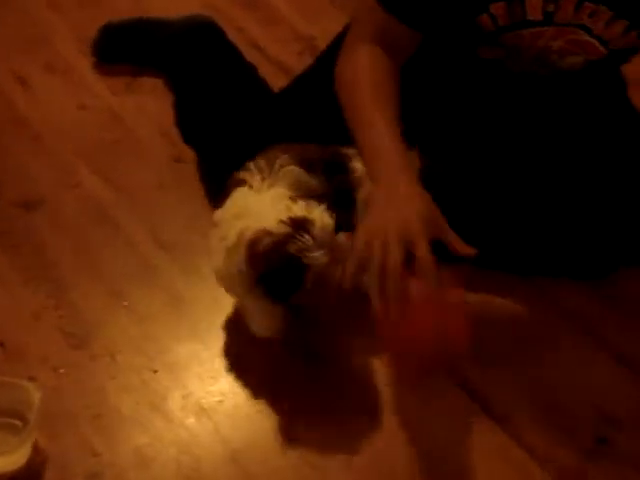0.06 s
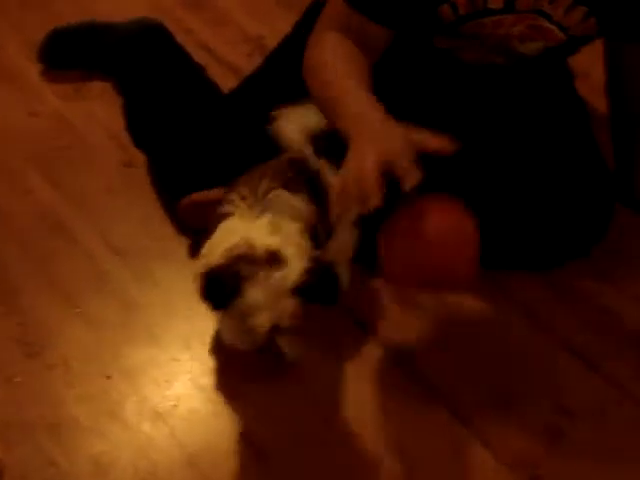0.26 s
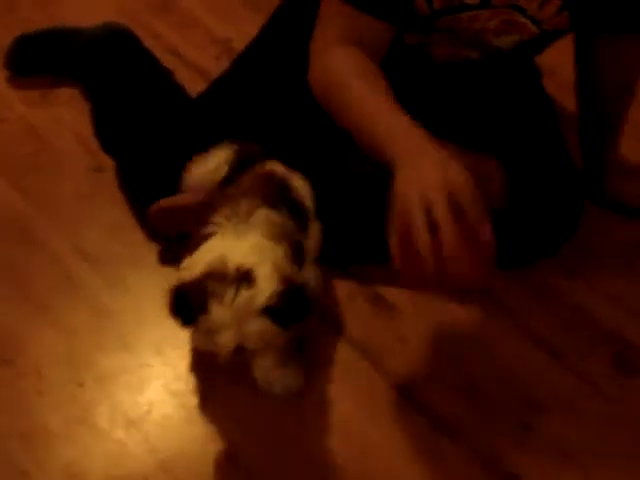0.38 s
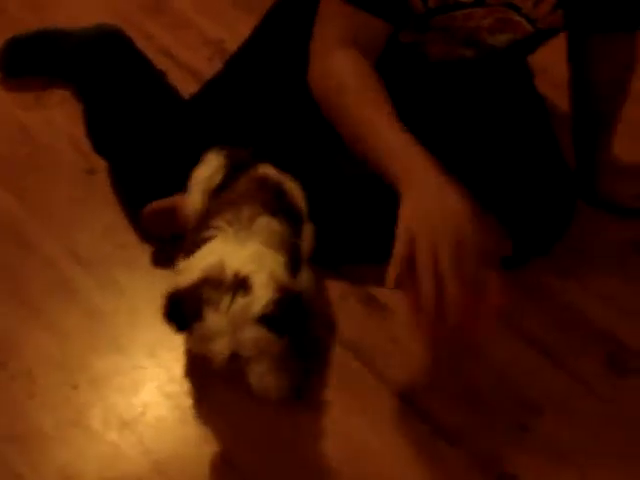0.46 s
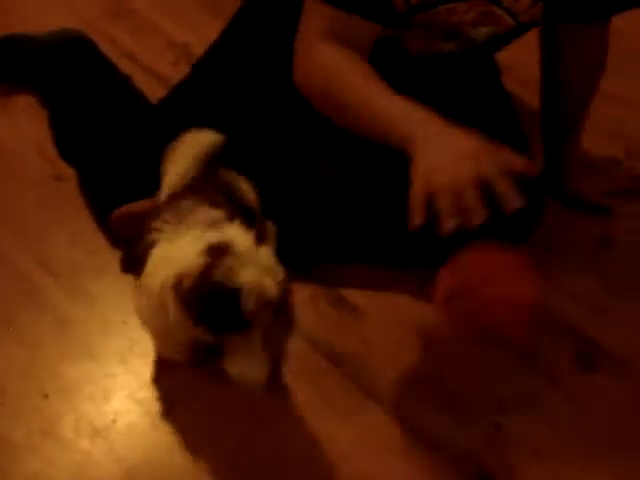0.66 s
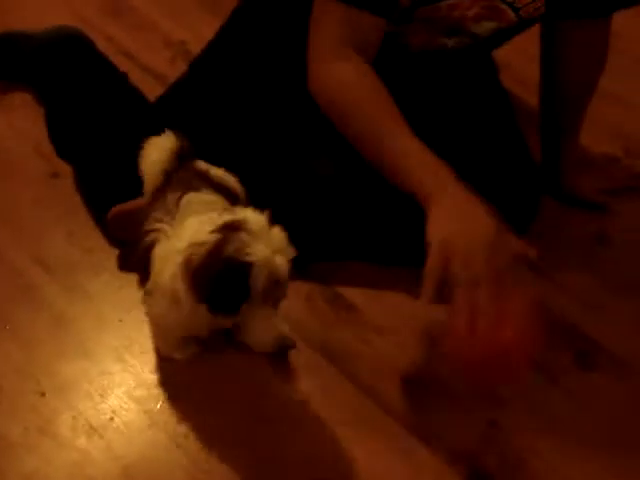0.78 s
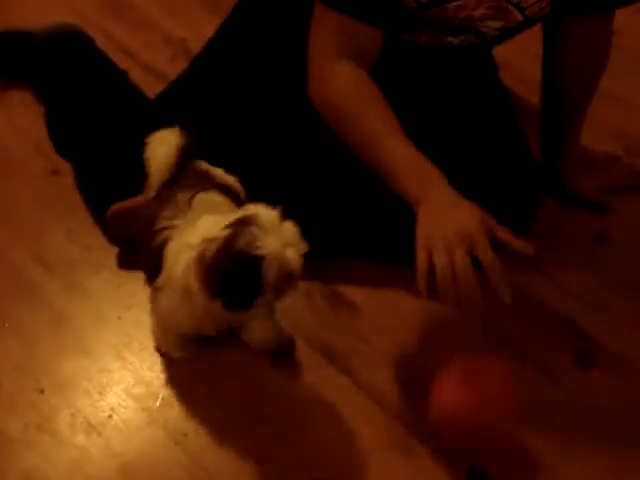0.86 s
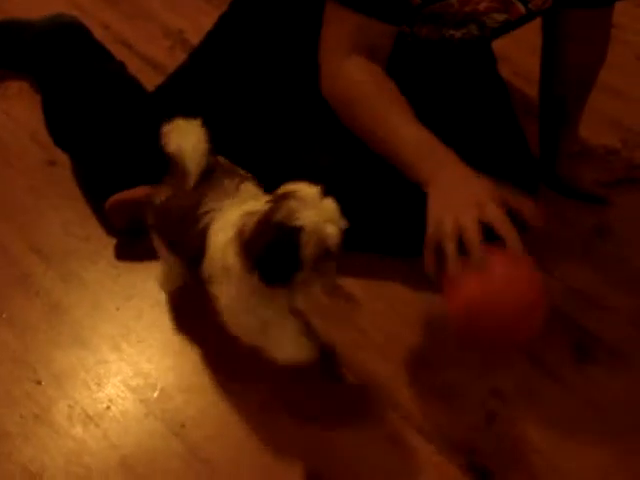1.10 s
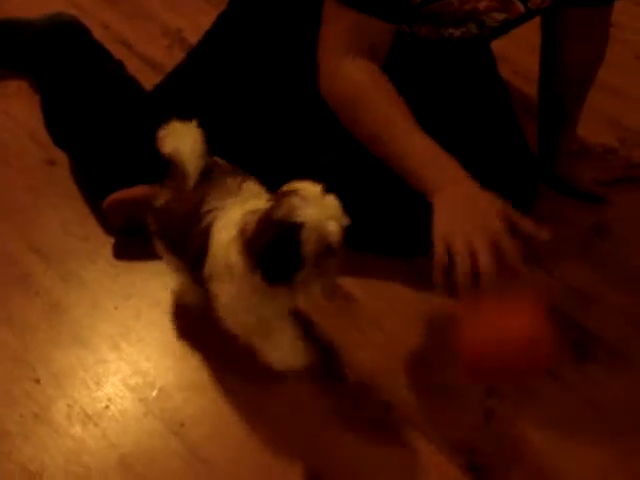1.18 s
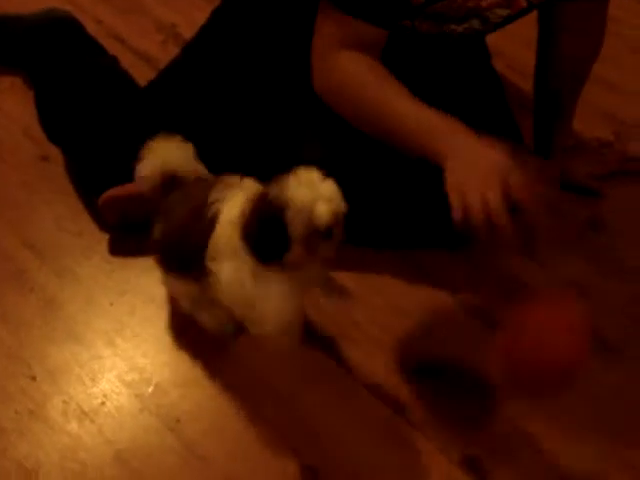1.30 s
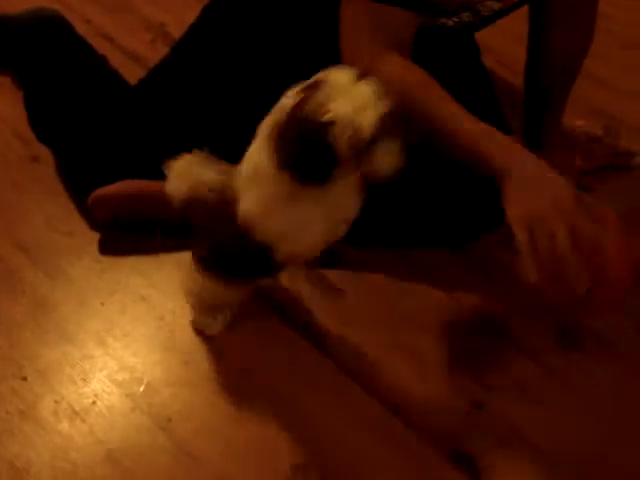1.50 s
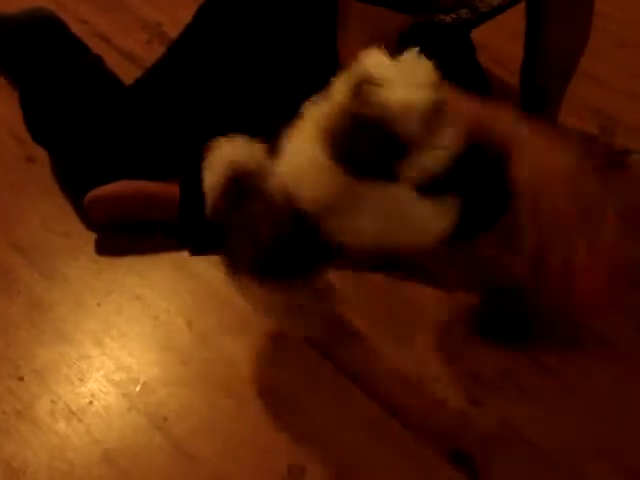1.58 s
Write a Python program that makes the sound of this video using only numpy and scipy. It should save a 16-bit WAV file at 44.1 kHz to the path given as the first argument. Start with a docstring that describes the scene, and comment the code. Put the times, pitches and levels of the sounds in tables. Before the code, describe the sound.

A small air-filled ball thuds on floorboards four times in quick succession, with a hand slap at the first bounce. The room echoes around the close microphone, and faint ticks and paw scuffs come from a dog.

```python
"""A ball bounced in a bare room

A small air-filled ball is bounced four times by hand on a wooden floor, and the bare room echoes.
Each bounce cracks, makes the boards and the ball ring, and puffs air at the close microphone.
A hand slaps the ball once. Hands and a dog's paws tap, rub and scuff over faint room noise."""
import sys
import numpy as np
from scipy import signal
from scipy.fft import rfft, irfft, next_fast_len
from scipy.io import wavfile

SR = 44100
rng = np.random.default_rng(int(sys.argv[2]) if len(sys.argv) > 2 else 0)


def dump(signal):
    """Clip the signal to [-1, 1] and save it as 16-bit WAV at the path in sys.argv[1]."""
    limited = np.clip(np.atleast_2d(signal).T, -1, 1)
    pcm = np.round(limited * 32767).astype(np.int16)
    wavfile.write(sys.argv[1], SR, pcm)


N = 72765
TOP_HZ = 10200  # the highest pitch the microphone picks up


def bounces():
    """The ball hits the floor: it cracks, boards and ball ring, air puffs out and the floor shudders."""
    # One row a bounce: start_s, crack_db, boards_db, ball_db, puff_db, echo_hold_s, echo_fade_s
    hits = [(0.2088, -20.5, -43, -29, -14.5, 0.051, 0.41), (0.6007, -21.5, -21.5, -36.5, -15, 0.018, 0.43),
            (0.9459, -21.5, -40, -35, -17, 0.024, 0.45), (1.2874, -21, -25, -37.5, -24.5, 0.011, 0.39)]
    # The tones that the floorboards and the ball ring with: pitch_hz, level_db, fade_s
    board_tones = [(206, -34, 0.22), (418.7, -1.5, 0.35), (480, -19, 0.26), (523.6, -0.5, 0.16),
                   (558, 9, 0.077), (576, 0.5, 0.21), (833, -20.5, 0.31), (868, -11, 0.36),
                   (932, -17, 0.11)]
    ball_tones = [(639, -6, 0.64), (694, -3, .5), (1045, -11.5, 0.79), (1375, -2, 0.19), (1432, -1, 0.17),
                  (1585, -19, 0.9), (1950, -4.5, 0.55), (2410, -5.5, 0.51), (2860, -3.5, .45),
                  (3188, 6.5, 0.15), (3890, -11, 0.26), (4184, 1.5, 0.3)]
    # The tone colour of the floor at each of the four landing spots: pitch_hz, level_db
    spot_1 = [(59, -61), (100, -23), (124, -17.5), (200, -5), (371, -8), (495, 3), (771, -8.5), (849, 0.5),
              (1070, -5.5), (1460, -3.5), (1770, -9.5), (3400, -2.5), (5610, -11), (8090, -14),
              (10000, -27), (13000, -66), (22000, -120)]
    spot_2 = [(59, -55), (100, -21.5), (139, -17.5), (196, -10.5), (289, -10), (416, -6), (458, -9),
              (566, -4.5), (714, -17), (833, 0), (953, -10), (2140, -15), (2360, -22.5), (3090, -17.5),
              (4540, -15), (7210, -21), (10000, -34), (13000, -76), (22000, -120)]
    spot_3 = [(59, -75), (100, -38), (204, -10), (257, -16), (350, -6), (556, -8.5), (648, 1), (817, -7.5),
              (990, -2.5), (1160, -11), (1670, -7), (2500, -6.5), (2910, -15.5), (3330, -5), (10000, -26),
              (13000, -61), (22000, -120)]
    spot_4 = [(59, -67), (100, -21), (252, -17.5), (524, -2.5), (566, -12.5), (714, -4.5), (833, -11.5),
              (972, -6), (1480, -11), (1700, -9.5), (2060, -18), (2800, -15), (3600, -19.5), (4200, -14.5),
              (4900, -20.5), (9080, -28), (10000, -39), (13000, -65), (22000, -120)]
    # The tone colour of the floor's deep shudder: pitch_hz, level_db
    shudder_colour = [(15, -4), (28, 5.5), (55, 2.5), (85, -13.5), (140, -24.5), (400, -52.5)]
    # How long the room holds each pitch, as a multiple of echo_fade_s: pitch_hz, fade_factor
    room_fades = [(60, 0.8), (250, 0.98), (700, 0.87), (1500, 0.97), (4000, 1.017), (9000, 0.97)]
    out, t = np.zeros(N), clock()
    puff = rise(0.0045) * np.exp(-t / 0.0084)  # one short pulse of air pressure
    shudder_shape = rise(0.018) * fade(0.37, start_db=-23.5)
    for hit, spot in zip(hits, (spot_1, spot_2, spot_3, spot_4)):
        start_s, crack_db, boards_db, ball_db, puff_db, hold_s, fade_s = hit
        fades = [(hz, fade_s * factor) for hz, factor in room_fades]
        crack = coloured(echoing_click(fades, hold_s, click_db=16, loss_db=1), spot)
        boards = amp(boards_db) * ring(board_tones, rise_s=0.0029)
        ball = amp(ball_db) * ring(ball_tones, rise_s=0.0016)
        shudder = shudder_shape * coloured(noise(), shudder_colour)
        add(out, start_s, amp(crack_db) * crack + boards + ball + amp(puff_db) * (puff + shudder))
    return out


def ring(tones, rise_s):
    """One blow sets off several tones together; each wavers a little and dies away."""
    out, t = np.zeros(N), clock()
    for pitch_hz, level_db, fade_s in tones:
        waver = np.interp(t, np.linspace(0, t[-1], 160), rng.standard_normal(160))
        out += fade(fade_s, level_db) * np.sin(2 * np.pi * pitch_hz * t + 0.2 * waver)
    return out * rise(rise_s)


def echoing_click(fades, hold_s, click_db, loss_db):
    """A click and its echoes, which hold, then die away as fades says (rows of pitch_hz, fade_s)."""
    t = clock()
    density = np.minimum(0.4 + (t / 0.039) ** 2, 1)  # echoes start sparse and thicken
    echoes = noise() * (rng.random(N) < density) / np.sqrt(density)
    hz, time_s, bands = signal.stft(echoes, SR, nperseg=256)  # split by pitch
    main_fade = amp(-60 * np.maximum(time_s - hold_s, 0) / value_at(fades, hz)[:, None])
    linger = amp(-21.5 - 60 * time_s)  # a faint tail that loses 60 dB a second
    out = signal.istft(bands * np.hypot(main_fade, linger), SR, nperseg=256)[1][:N]
    out *= 1 - 0.1 * np.exp(-t / 0.022)  # the echoes build up behind the click
    # The click goes back and forth between two hard surfaces, losing loss_db each trip.
    trips, trip_s = np.arange(5), 0.00686
    out[np.round(trips * trip_s * SR).astype(int)] = amp(click_db - loss_db * trips)
    return out


def hand_slap():
    """A hand makes a short, bright smack on the ball's skin."""
    # When the hand lands: start_s, level_db
    slaps = [(0.2273, -23)]
    # The tone colour of the smack: pitch_hz, level_db
    slap_colour = [(100, -11), (900, -11.5), (2000, -13), (3200, -7), (4500, -4), (6000, -24),
                   (8200, -13.5), (10000, -40)]
    out = np.zeros(N)
    for start_s, level_db in slaps:
        smack = echoing_click(fades=[(1, 0.15)], hold_s=0.015, click_db=11, loss_db=0)
        add(out, start_s, amp(level_db) * coloured(smack, slap_colour))
    return out


def light_taps():
    """Fingers and claws make sharp little ticks with a thin metallic ring."""
    # One row a tap: start_s, tick_db, brightness_db_per_octave, jingle_db
    taps = [(0.0555, -54, -3, -54.5), (0.097, -53, 3, -47), (0.8445, -48.5, 0, -80), (0.851, -37, -2, -64),
            (1.5711, -39.5, 0.5, -44.5), (1.5723, -43, 1, -47.5)]
    # The tone colours of the tick and of its rough metallic ring: pitch_hz, level_db
    tick_colour = [(60, -39), (250, -6.5), (550, 5.5), (1000, -0.5), (2200, 0.5), (3600, -8), (5500, -15.5),
                   (10000, -25)]
    jingle_colour = [(400, -32.5), (1850, -22), (2060, -2), (2200, 6), (2330, -4), (2520, -11), (3200, -14),
                     (4500, -35.5)]
    out = np.zeros(N)
    for start_s, tick_db, brightness, jingle_db in taps:
        click = echoing_click(fades=[(1, 0.2)], hold_s=0.0018, click_db=25.5, loss_db=2)
        tick = coloured(click, tick_colour, brightness)
        jingle = coloured(noise(), jingle_colour) * fade(0.4)
        add(out, start_s, amp(tick_db) * tick + amp(jingle_db) * jingle)
    return out


def paw_scuffs():
    """Paws land softly on the boards, each with a dull burst of noise."""
    # One row a scuff: start_s, level_db, brightness_db_per_octave
    scuffs = [(0.436, -39, 4), (0.463, -39, 1), (0.775, -47.5, 1.5), (0.893, -45, -.5)]
    # The tone colour of a paw on wood: pitch_hz, level_db
    scuff_colour = [(50, -3.5), (130, 4.5), (250, 10), (650, 0.5), (1200, -4), (3000, -17.5),
                    (10000, -35.5)]
    out = np.zeros(N)
    shape = rise(0.0018) * fade(0.33)
    for start_s, level_db, brightness in scuffs:
        add(out, start_s, amp(level_db) * coloured(shape * noise(), scuff_colour, brightness))
    return out


def soft_rubs():
    """Hand and fur brush along, making soft swells of hiss."""
    # One row a rub: middle_s, width_s, level_db, brightness_db_per_octave
    rubs = [(0.102, 0.015, -48, 0), (0.84, 0.039, -64, 5.5)]
    # The tone colour of the hiss: pitch_hz, level_db
    rub_colour = [(200, -25), (1500, -9), (2300, 3), (4500, 2.5), (7000, -3.5), (10000, -22)]
    out = np.zeros(N)
    for middle_s, width_s, level_db, brightness in rubs:
        swell = amp(level_db) * np.exp(-0.5 * ((clock() - middle_s) / width_s) ** 2)
        out += swell * coloured(noise(), rub_colour, brightness)
    return out


def room_noise():
    """A faint rush fills the room, slowly growing louder and softer."""
    # The tone colour of the rush: pitch_hz, level_db
    rush_colour = [(20, -24), (40, -9.5), (70, -8.5), (140, -6), (230, -7.5), (335, -4), (450, -6),
                   (635, -1.5), (790, -4.5), (1130, -10.5), (1480, -5.5), (1820, -12), (3860, -23),
                   (7000, -25), (10000, -31), (13000, -56)]
    # How loud the rush is over time: time_s, level_db
    rush_levels = [(0, -45), (.18, -48.5), (.52, -45.5), (.82, -51.5), (1.198, -51), (1.6, -48.5)]
    level_db = np.interp(clock(), *np.transpose(rush_levels))
    return amp(level_db) * coloured(noise(), rush_colour)


def amp(db):
    """Turn decibels into a number to multiply a sound by."""
    return 10 ** (np.asarray(db) / 20)


def clock():
    """The time in seconds at every sample."""
    return np.arange(N) / SR


def noise():
    """A fresh hiss, equally strong at every frequency."""
    return rng.standard_normal(N)


def rise(rise_s):
    """Climb from 0 towards 1, getting about two thirds of the way in rise_s."""
    return 1 - np.exp(-clock() / rise_s)


def fade(fade_s, start_db=0):
    """Die away by 60 dB every fade_s seconds."""
    return amp(start_db - 60 * clock() / fade_s)


def value_at(points, hz):
    """Read between the rows of a (pitch_hz, value) table."""
    pitches, values = np.transpose(points)
    return np.interp(np.log(hz + 1), np.log(pitches + 1), values)


def add(track, start_s, sound):
    """Mix a sound into the track from start_s on."""
    start = max(0, round(start_s * SR))
    track[start:] += sound[:N - start]


def coloured(sound, colour, brightness=0):
    """Give a sound a tone colour, then tilt it about 1 kHz by brightness (dB per octave)."""
    size = 2 * next_fast_len(N)
    hz = np.fft.rfftfreq(size, 1 / SR)
    gain = amp(value_at(colour, hz)) / np.sqrt(1 + (hz / TOP_HZ) ** 20)
    gain /= np.sqrt(np.mean(gain ** 2))  # the colour alone leaves a hiss's power unchanged
    gain *= amp(brightness * np.log2(np.maximum(hz, 125) / 1000))
    # Fold the filter forward in time, so that nothing sounds before the hit that causes it.
    folded = irfft(np.log(gain + 1e-9))
    folded[1:size // 2] *= 2
    folded[size // 2 + 1:] = 0
    return irfft(rfft(sound, size) * np.exp(rfft(folded)), size)[:N]


def scene():
    """All the sounds meet at one microphone."""
    return (bounces() + hand_slap() + light_taps() + paw_scuffs() + soft_rubs() + room_noise())[None]


def record(dry):
    """The microphone rounds off the loudest peaks and keeps nothing above TOP_HZ."""
    peak_limit = 0.5
    rounded = dry / (1 + (dry / peak_limit) ** 4) ** (1 / 4)
    size = next_fast_len(N + SR // 2)
    hz = np.fft.rfftfreq(size, 1 / SR)
    treble_cut = np.clip((TOP_HZ - hz) / 200, 0, 1)
    return irfft(rfft(rounded, size) * treble_cut, size)[..., :N]


dry = scene()
out = record(dry)
dump(out)
```